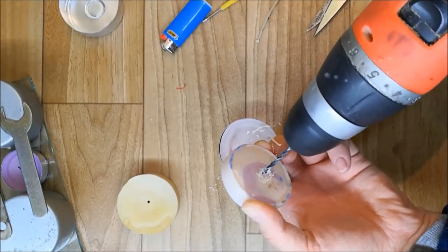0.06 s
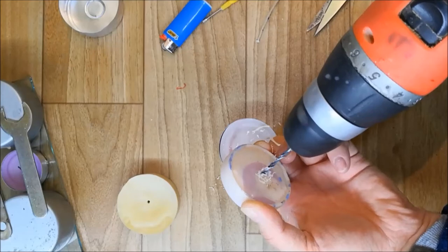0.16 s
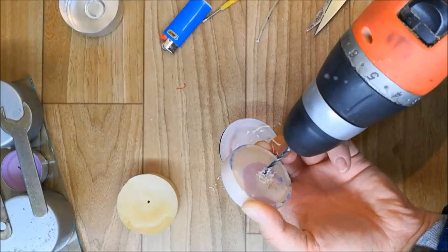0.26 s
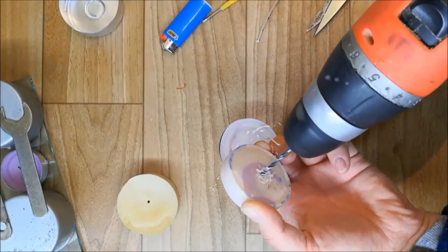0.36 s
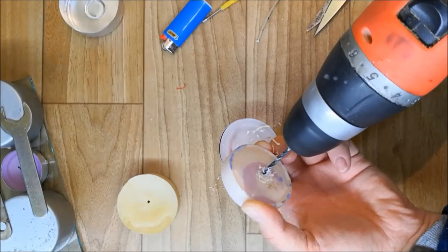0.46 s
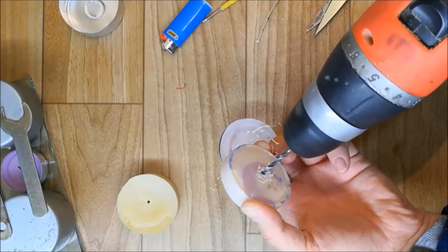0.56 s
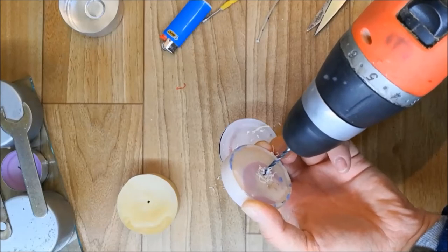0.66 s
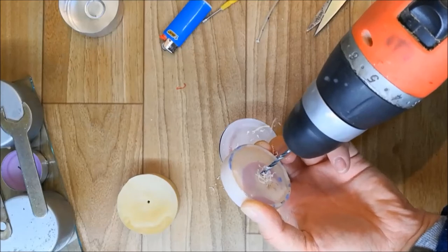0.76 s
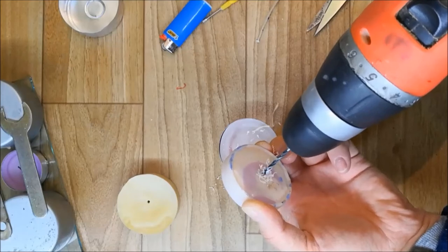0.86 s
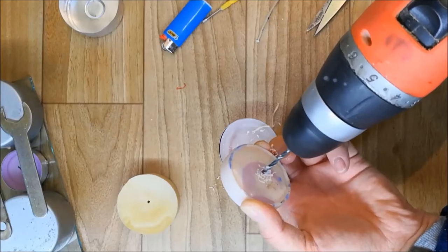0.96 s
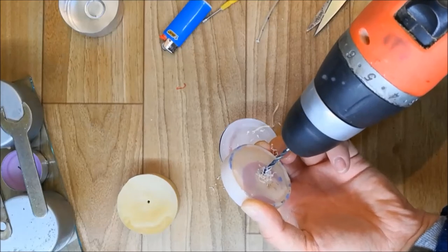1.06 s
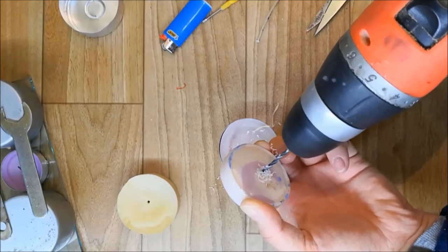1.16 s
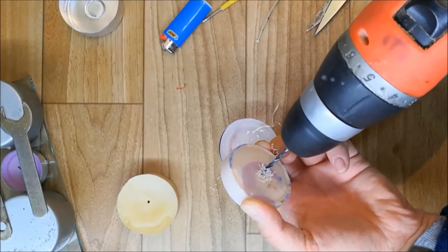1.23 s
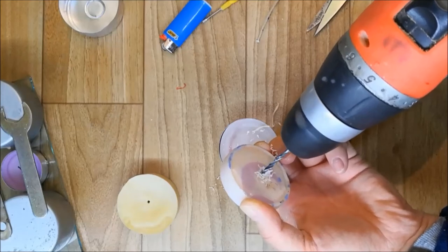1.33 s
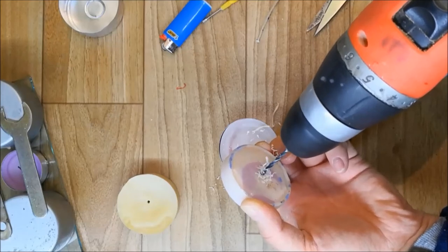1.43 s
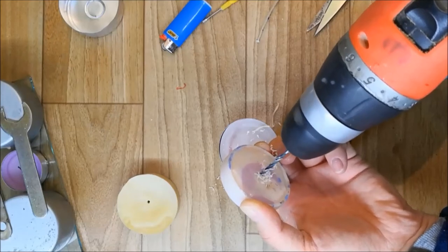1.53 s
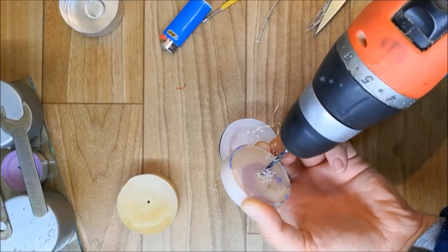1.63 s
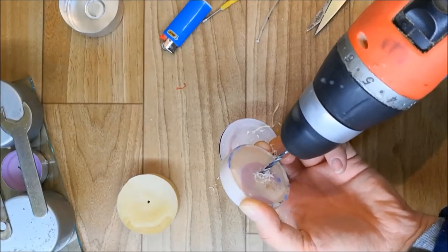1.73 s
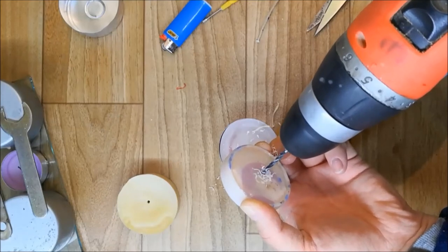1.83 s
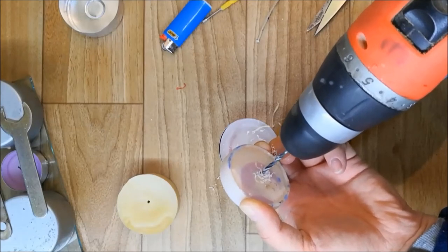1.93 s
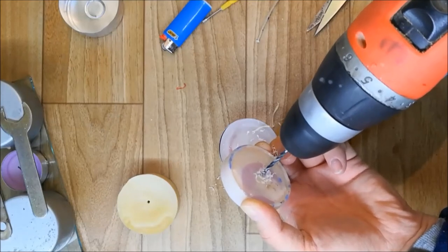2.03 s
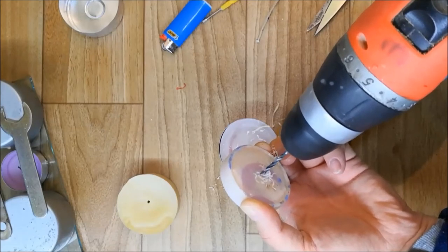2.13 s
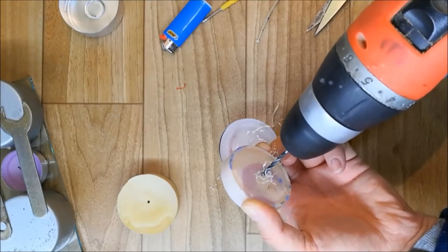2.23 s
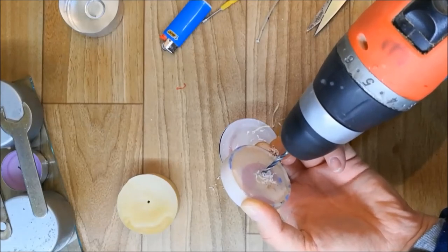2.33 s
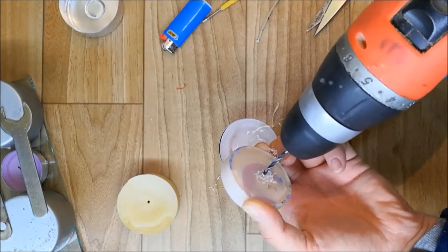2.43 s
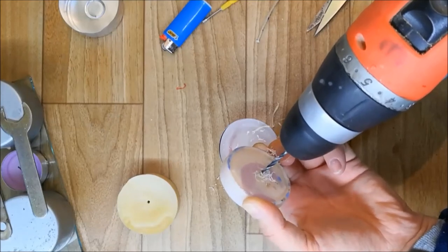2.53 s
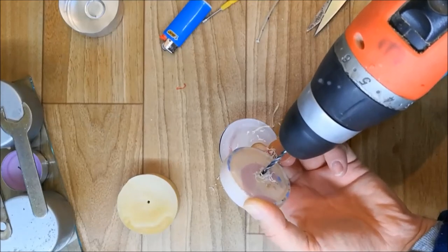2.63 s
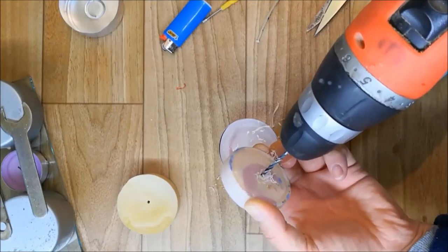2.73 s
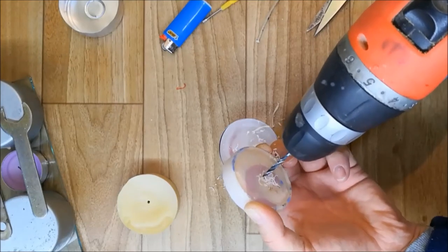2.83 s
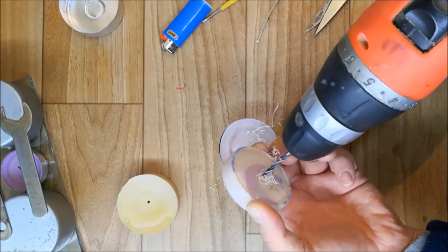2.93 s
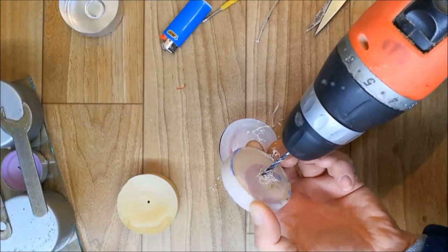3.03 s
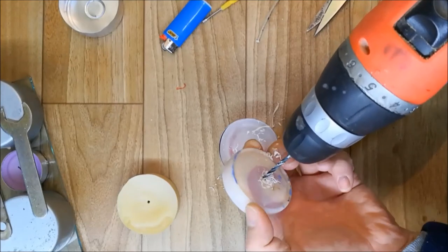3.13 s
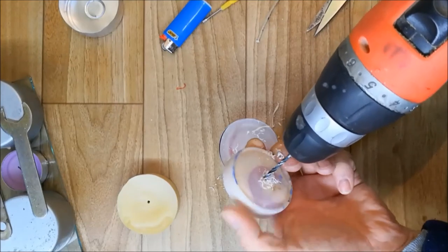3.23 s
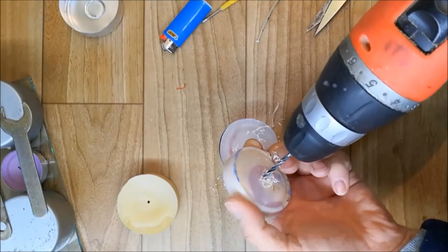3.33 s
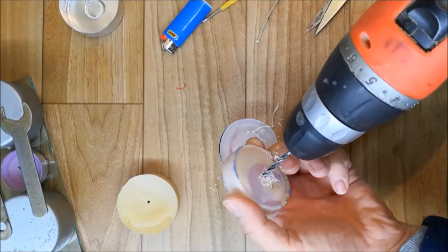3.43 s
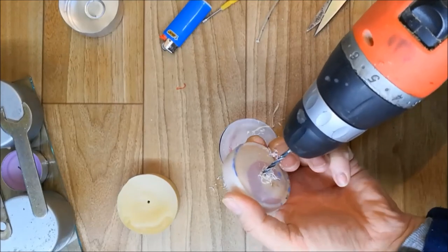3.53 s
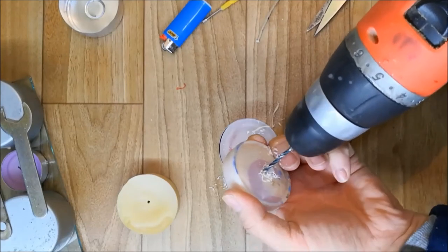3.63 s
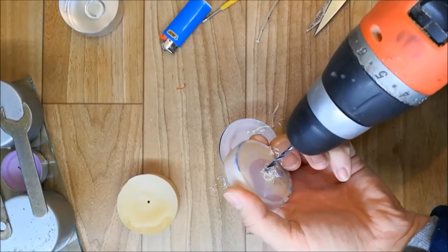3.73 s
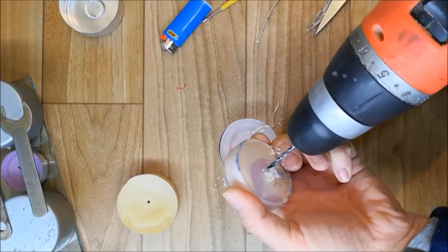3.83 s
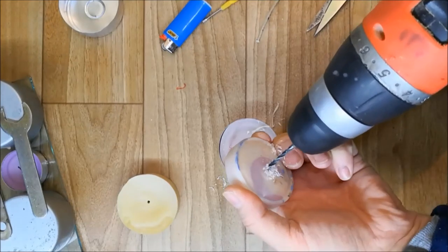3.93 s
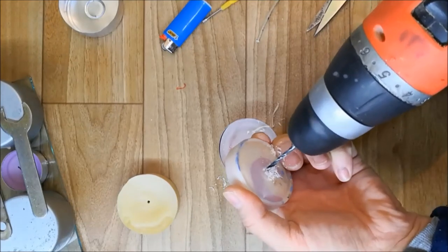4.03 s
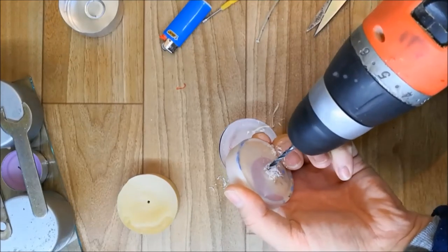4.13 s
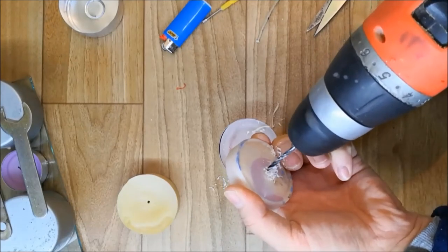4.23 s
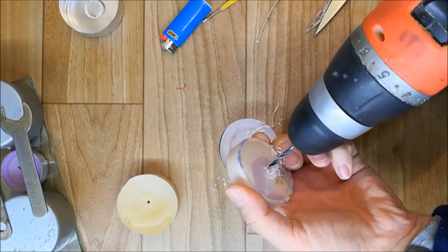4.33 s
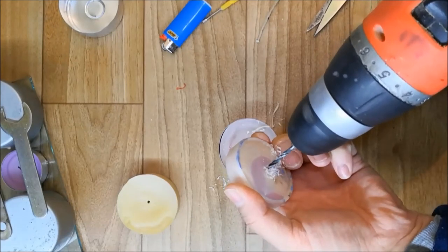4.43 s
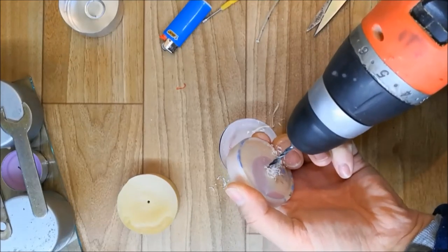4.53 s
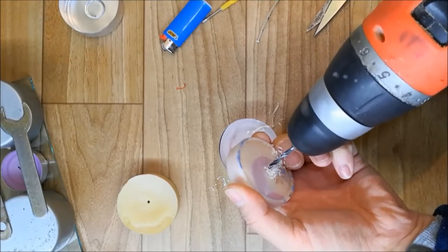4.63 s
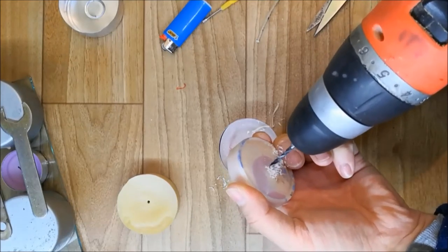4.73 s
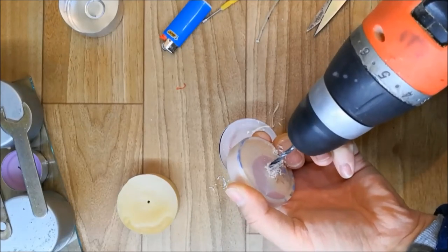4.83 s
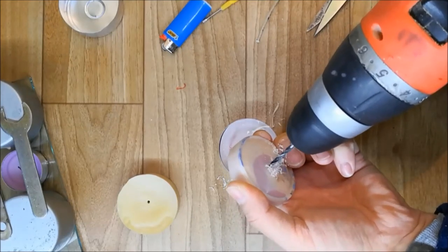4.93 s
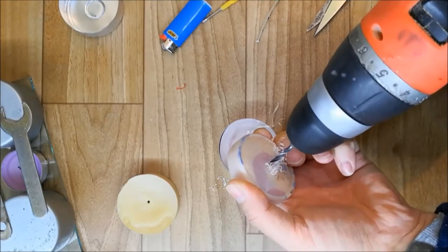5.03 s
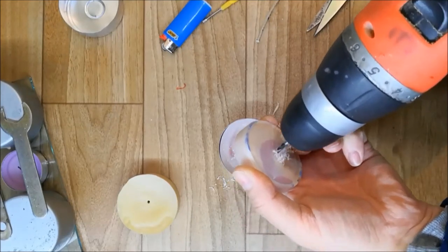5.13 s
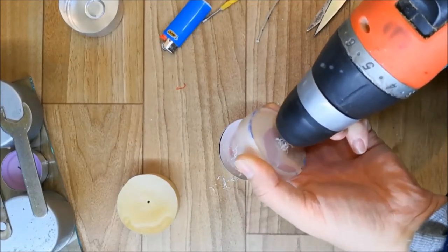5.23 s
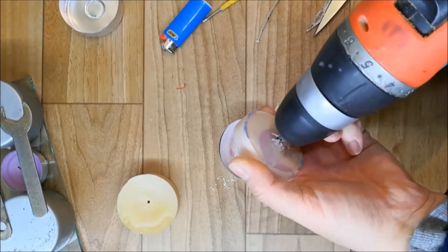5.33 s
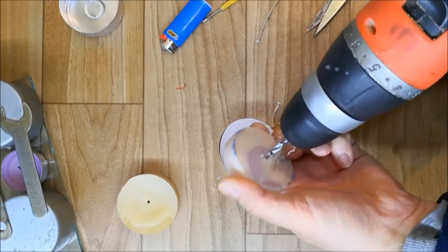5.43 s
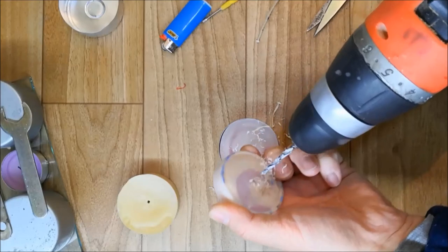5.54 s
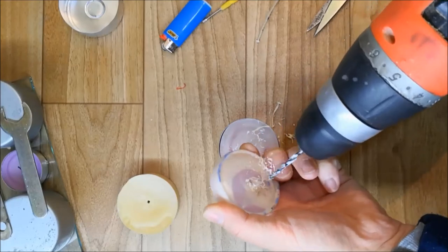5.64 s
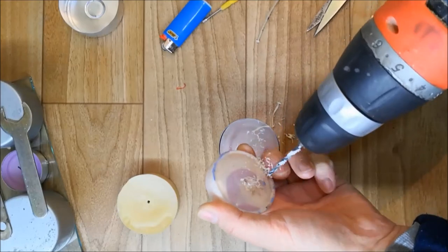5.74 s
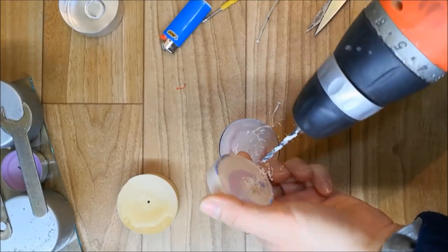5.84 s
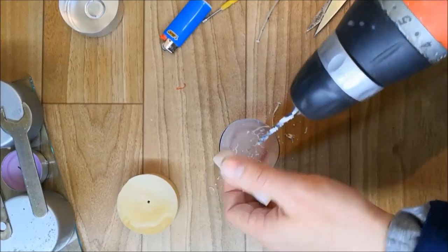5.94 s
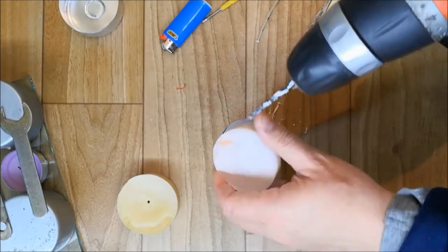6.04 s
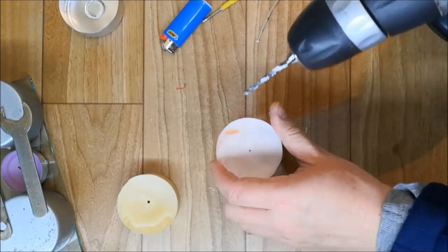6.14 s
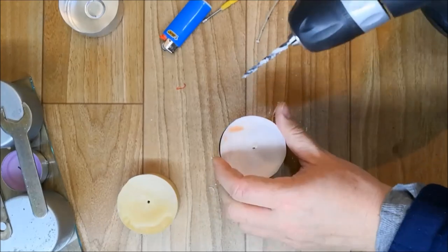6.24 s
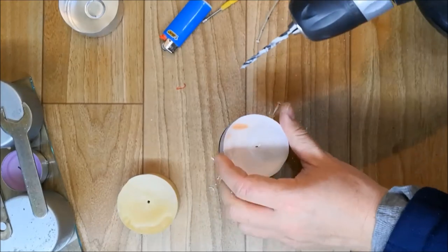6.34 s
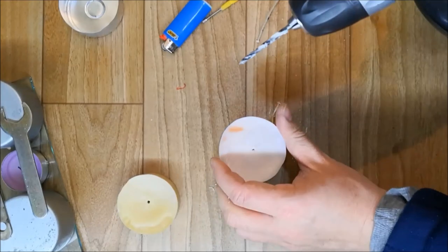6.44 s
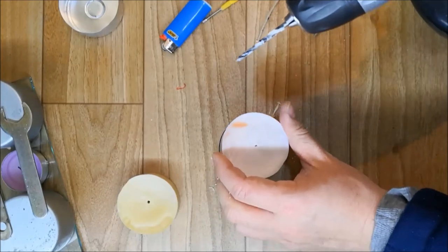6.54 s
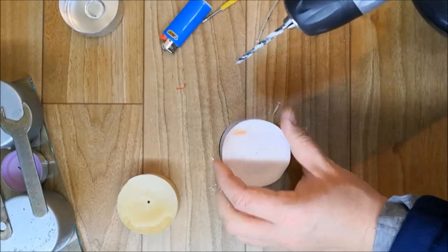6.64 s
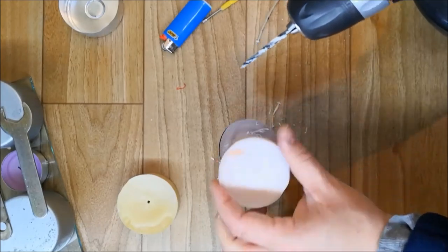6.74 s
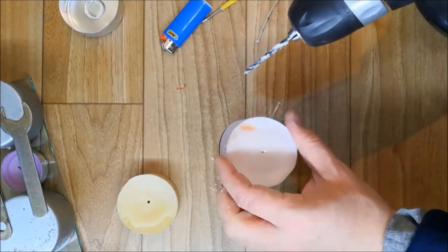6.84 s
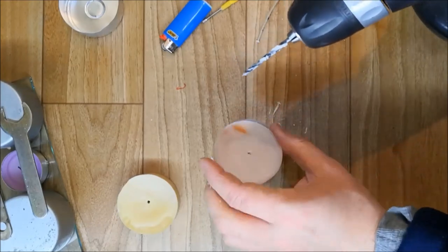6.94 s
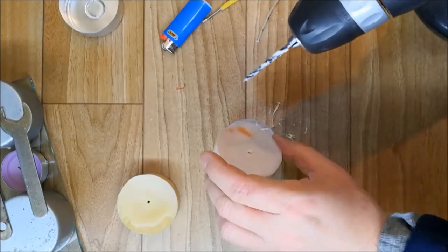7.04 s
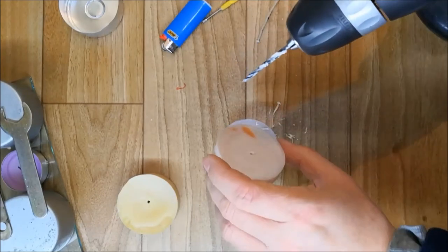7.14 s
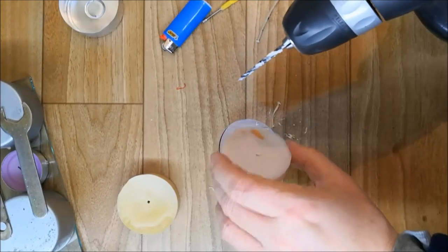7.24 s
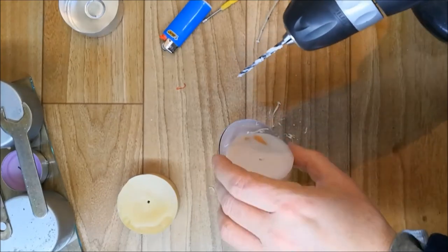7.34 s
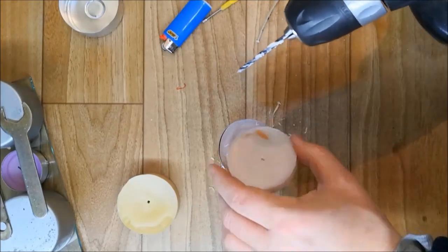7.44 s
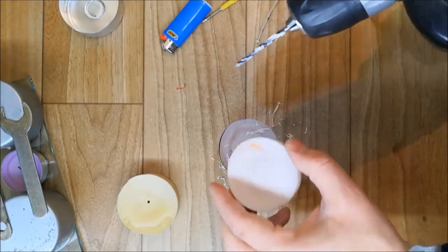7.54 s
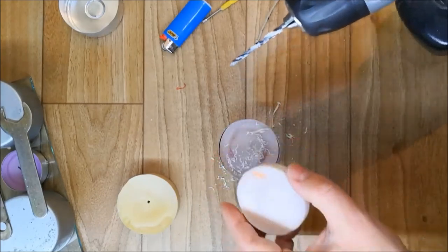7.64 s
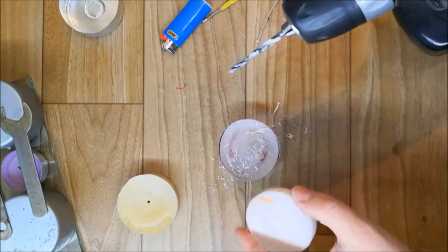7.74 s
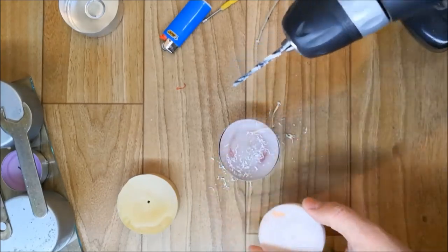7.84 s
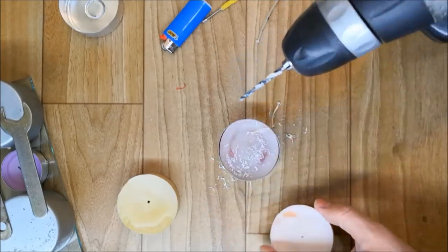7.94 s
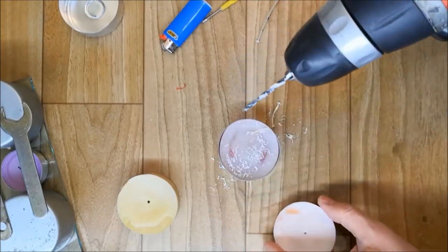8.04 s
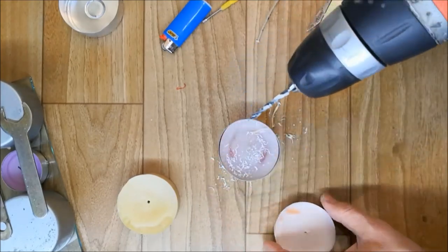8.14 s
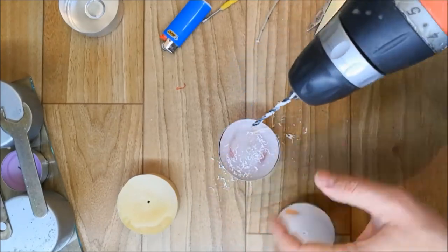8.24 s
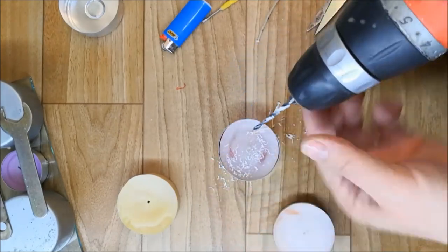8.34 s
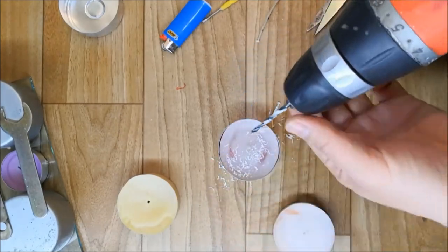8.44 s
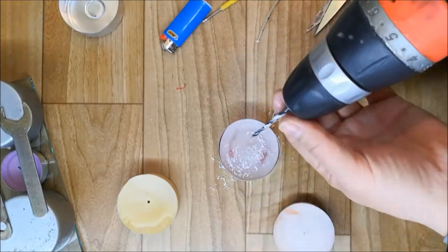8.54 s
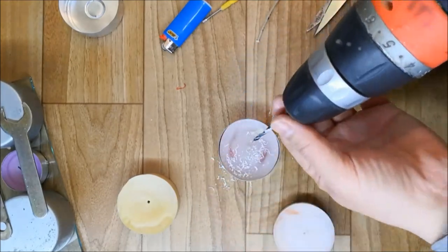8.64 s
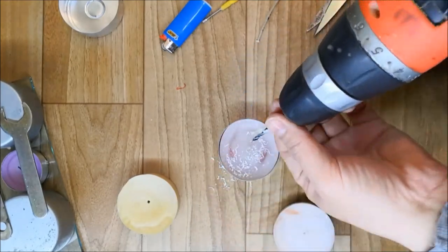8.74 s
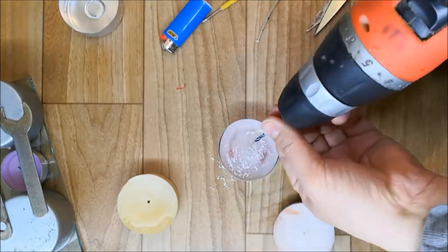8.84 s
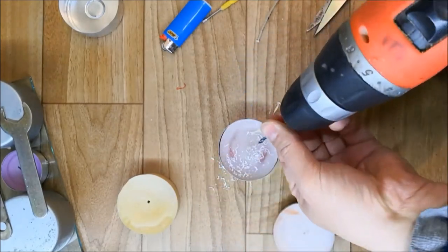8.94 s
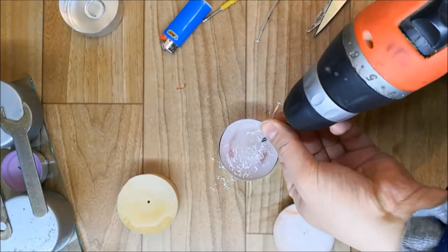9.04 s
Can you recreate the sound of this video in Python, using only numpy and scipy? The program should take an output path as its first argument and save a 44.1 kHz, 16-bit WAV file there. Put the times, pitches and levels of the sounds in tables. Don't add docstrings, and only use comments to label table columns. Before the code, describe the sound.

Close stereo pickup of a cordless drill boring a wax candle over a wooden floor. It is already at full speed, a steady gritty whirr with a thin gear whine, then brakes sharply with a clack. After a short pause with a small tap, the trigger chirps and a louder, rougher burst follows for two seconds. It stops with a hard clack; then quiet, one tap, and later a thing set down.

```python
import sys
import numpy as np
from scipy import signal
from scipy.fft import rfft, irfft, next_fast_len
from scipy.io import wavfile

SR = 44100
rng = np.random.default_rng(int(sys.argv[2]) if len(sys.argv) > 2 else 0)


def to_wav(sig):
    pcm = np.clip(np.atleast_2d(sig), -1, 1) * 32767
    pcm = np.round(pcm).astype(np.int16)
    wavfile.write(sys.argv[1], SR, pcm.T)


def ratio(d):
    e = np.asarray(d, float) / 20
    return 10 ** e


N = 400407
TIME_S = np.arange(N) / SR
FFT_SIZE = next_fast_len(N)
HZ = np.fft.rfftfreq(FFT_SIZE, 1 / SR) + 1e-3
FRAME = round(0.02 * SR)

# (frequency [Hz], density [dB per Hz])
FLOOR_COLOUR = [(30, -25), (50, -4.5), (75, -11), (98, -9.5), (150, -6.5), (200, -4), (244, 1.5), (300, -8),
                (350, -6.5), (398, -4.5), (873, -4.5), (971, -6.5), (1450, -5.5), (2180, -7), (3780, -8.5),
                (5320, -11.5), (6800, -20), (9640, -43.5), (12500, -66), (21200, -120)]
# (frequency [Hz], left-right [dB])
FLOOR_BALANCE = [(60, 5), (210, -3), (740, -1), (2610, -4), (9190, -4.5)]
# (frequency [Hz], power share [0-1])
BUZZ_SHARE = [(50, 0.67), (150, 0.99), (400, 0.53), (1000, 0.54), (2200, 0.28), (5000, .36)]
# (time [s], level [dB], sag [dB/s])
GATE = [(2.93, -63.5, 168.5), (3.045, -94, 900), (3.11, -76, 17), (3.21, -67, 74), (3.27, -72.5, -8),
        (3.7, -63, 28), (5.93, -70.5, 249.5), (5.99, -82.5, 72), (6.1, -96.5, 1500), (6.275, -83.5, -4.5),
        (6.38, -82.5, -110), (6.45, -72, -110), (6.52, -66, 200), (6.56, -73.5, 6), (6.7, -74, 33),
        (7.0, -75.5, 3), (7.75, -79.5, 0), (8.145, -74.5, 5), (8.6, -76, 15), (8.8, -78.5, 0),
        (9.07, -78.5, -4.5)]
# (time [s], peak [dB], frequency [Hz], t60 [s], rumble [dB])
BUMPS = [(2.28, -66, 90, .1, -68), (2.6, -66, 90, .1, -68), (2.871, -59, 79, 0.12, -93),
         (3.194, -70, 230, .08, -85), (5.86, -59, 80, 0.11, -96), (6.19, -78, 55, .06, -110),
         (6.487, -67, 52, .1, -87), (6.505, -43.5, 140, 0.024, -77), (6.997, -59.5, 75, 0.12, -74),
         (8.142, -53.5, 90, 0.07, -94), (8.179, -56, 86, .08, -80.5), (8.286, -58.5, 95, 0.081, -75)]
# (time [s], [(frequency [Hz], peak [dB], t60 [s], left-right [dB])])
TAPS = [
    (3.1895, [(1300, -47, 0.0092, 7), (1650, -40, .009, -8), (3150, -53, .004, 5), (4200, -49, .004, 4), (1950, -45, .007, 4), (2600, -42.5, 0.0055, 4), (3700, -43.5, 0.004, 6), (4720, -42, 0.0087, -10), (5350, -46, .005, -1), (6100, -50, 0.0046, 8), (6900, -51, .005, 7)]),
    (6.499, [(1150, -49, .006, 2), (1850, -46, .007, 2), (2300, -46, 0.0067, -1), (2800, -45, 0.0085, -1), (3350, -49, .006, 1), (3800, -59, .004, 0), (4750, -58, .004, 0), (4300, -52, .006, -2), (5200, -55, .005, 3)]),
    (8.1819, [(447, -54, .008, 3), (800, -61, .006, 3), (1550, -53, .005, 2), (2110, -51.5, .006, -4), (2650, -39.5, 0.0081, 10), (2420, -63, .07, 4), (3220, -47, .004, 4), (3820, -49, .004, 6), (5000, -62, .004, 3), (1150, -61, .005, 3), (4450, -50.5, .006, 1), (5700, -61, .005, 4)]),
]
# (middle [s], half length [s], level [dB], frequency [Hz], width [Hz])
CHUCK_RUMBLE = [
    (4.5, .55, -68.5, 125, 40),
    (3.42, .25, -75.5, 235, 110),
    (8.225, .03, -81, 2500, 700),
    (8.345, .022, -81, 2400, 1500),
    (10, 0.27, -88, 246, 60),
]
# (time [s], frequency [Hz], peak [dB], half length [s], left-right [dB])
PINGS = [(2.805, 2628, -38, .008, -11), (2.834, 2600, -42, 0.004, -12), (2.866, 640, -43.5, 0.0072, 14),
         (2.868, 1560, -42, .008, -9), (2.872, 3390, -42, 0.007, 1), (2.871, 2550, -42, .006, 0),
         (3.858, 250, -56, .012, 0), (3.866, 650, -53, .012, 4), (2.889, 360, -50, .008, 0),
         (3.745, 260, -57, .012, 0), (3.772, 300, -54, .01, 0), (5.88, 290, -56, .012, 0),
         (5.853, 2900, -38, .006, 0), (3.696, 3640, -51, .006, 7), (3.753, 3760, -40, .012, 3),
         (3.77, 2130, -41, .007, 4), (3.795, 290, -49, .012, 3), (3.800, 970, -47, 0.021, 0),
         (3.815, 1403, -37.5, 0.012, -10.5), (3.817, 3390, -39.5, 0.0086, 6), (3.820, 508, -45, 0.009, 9.5),
         (3.914, 2380, -36.5, .006, 8.5), (5.792, 950, -42, .010, 10), (5.842, 3135, -38, 0.009, 4),
         (5.856, 3590, -36, .006, 7.5)]
# (time [s], level [dB], length [s])
CLACKS = [
    (2.872, -41.5, 0.015),
    (3.813, -42, 0.026),
    (5.852, -38, 0.02),
]
# [(frequency [Hz], level [dB], t60 [s])]
CLACK_MODES = [
    [(651, -7.5, 0.091), (1170, -4, 0.044), (1550, 5.5, 0.02), (2470, 0.5, 0.026), (2900, -3, .015),
     (3620, -4, 0.019), (4300, -6.5, 0.014)],
    [(283, -14, 0.049), (498, -12, .04), (1440, -2, 0.051), (2125, -1, 0.047), (3720, 0, 0.03)],
    [(637, -13, 0.084), (1060, -7.5, 0.019), (1430, -1, 0.016), (1743, -2, 0.034), (3050, -4, 0.039)],
]
# (time [s], level [dB])
SQUEEZE = [(3.673, -95), (3.676, -58), (3.695, -60), (3.699, -45), (3.74, -44), (3.77, -49), (3.8, -80)]
# (frequency [Hz], width [Hz], level [dB])
SWITCH_TONES = [(2600, 140, -11), (3700, 330, -2.5)]
# (trigger pulled [s], let go [s], chuck stopped [s], full speed [turns/s], creep [turns/s per s])
RUN_FIRST = (-2.0, 2.775, 2.885, 293.1, .34)
RUN_SECOND = (3.672, 5.757, 5.864, 299, .3)
# (grind [dB], hum [dB], commutator [dB], whine [dB], drop at power cut [dB], fall once stopped [dB/s])
LOAD_FIRST = (-38, -52.5, -51.5, -54.5, 0, 426)
LOAD_SECOND = (-33.5, -51, -53, -48.5, 0.5, 498)
# (frequency [Hz], density [dB per Hz])
GRIND_FIRST = [(24, -49), (40, -25.5), (54, -40.5), (204, -25), (295, -5.5), (379, -22), (658, -23),
               (886, -16), (971, -9.5), (2380, -9), (2670, -2.5), (2990, -8), (5430, -14), (6830, -23),
               (9640, -50), (12500, -81), (21200, -120)]
GRIND_SECOND = [(24, -56), (40, -24.5), (54, -38), (240, -21.5), (295, -15.5), (456, -24.5), (738, -20.5),
                (886, -9.5), (1170, -8.5), (1980, -7), (2430, -5), (2730, -8.5), (2990, -5), (6230, -15),
                (9640, -48), (12500, -94.5), (21200, -120)]
# (frequency [Hz], left-right [dB])
GRIND_BALANCE = [(60, 4), (100, -2.5), (180, -1.5), (320, -1), (560, 4), (980, 0.5), (1720, -3.5),
                 (3000, 1), (5250, 6), (9190, 6)]
# (frequency [Hz], width [Hz], level [dB], left-right [dB])
HOUSING_FIRST = [(269, 130, -3, 1), (875, 53, 7, 15.5), (716, 60, 1, -4.5), (1190, 52, -2, -7),
                 (1340, 57, -4, 2), (2340, 200, -2, 5.5), (1977, 450, 4, 6.5), (2420, 450, 2, 2.5),
                 (2657, 610, -4, -9.5), (3315, 680, 3.5, 7.5), (4250, 830, -2.5, -3.5),
                 (5300, 320, 2, -2.5), (7870, 910, -4, -7.5)]
HOUSING_SECOND = [(131, 20, -0.5, 3.5), (290, 45, -1, 10), (905, 200, -0.5, 9), (1190, 65, -3.5, -5),
                  (1560, 100, -2.5, 6.5), (3060, 300, -2, 3), (6300, 900, -2, 4), (7900, 900, -3.5, -5.5),
                  (1790, 120, 4.5, 8), (1980, 220, 4, 4.5), (2440, 240, -10, 4), (2650, 340, 6.5, -5.5),
                  (3550, 410, 5, 3.5), (3750, 150, 0, -0.5), (4120, 280, -4, -3), (5370, 67, 6.5, -9.5)]
SLACK_DB = [3, -2.5, -2.5, 1, 0, -2, 1]
# (flutter [dB], flutter rate [1/s], coasting fade [dB/s], share of housing tuning [1])
ORDER_HABITS = [(2.0, 12, 30, .2), (3.6, 18, 200, .55), (1.3, 25, 1400, 1.3)]
# (left-right [dB], left lead [rad])
PLACE_FIRST = [(-1.5, .45), (2.8, 2.2), (-22, -1.1)]
PLACE_SECOND = [(-1.9, .55), (9, 1.9), (-22, -2.5)]
# (multiple [1], level re commutator [dB], left-right [dB])
WEAK_ORDERS = [(2, -17, 8), (5, -14, -7.5), (6, -8, 8.5), (12, -11.5, 7)]
# (middle [s], half length [s], multiple [1], lift [dB])
FLARES = [(.225, .165, 9, 7), (3.91, .025, 1, 4), (3.85, .035, 1, -8), (4.0, .05, 3, 6), (.55, .13, 9, -3),
          (.85, .1, 9, -1.5), (1.17, .03, 9, -4), (1.65, .06, 9, -3), (4.22, .05, 9, 2), (5.73, .035, 9, 3),
          (2.75, .03, 9, 4), (5.63, .09, 5, 11), (5.38, .04, 5, 8), (4.15, .06, 2, 4), (5.1, .3, 2, 4),
          (.25, .25, 2, -5), (4.42, .03, 3, -5), (4.68, .04, 3, -6), (4.95, .08, 3, 2), (4.7, .04, 6, 11),
          (4.88, .04, 6, 12), (5.68, .07, 6, 7), (.45, .08, 1, -4), (.95, .15, 1, 2.5), (4.02, .035, 1, 4),
          (4.08, .03, 1, -2), (4.15, .04, 1, -3), (4.45, .1, 1, 2), (4.68, .1, 1, -3), (2.5, .15, 1, -3),
          (5.54, .05, 1, 3), (5.11, .06, 3, 5), (5.23, .05, 3, -8), (5.36, .04, 3, 4), (5.48, .05, 3, 4.5)]
# (frequency [Hz], width [Hz], level re whine [dB])
SKIRT_FIRST = [(2628, 200, -5), (2760, 79, -7.5), (2666, 45, -9)]
SKIRT_SECOND = [(2690, 60, -7), (2803, 26, -4), (2750, 120, -5)]
# (middle [s], half length [s], level [dB])
CLIMB = (3.84, 0.052, -57)
# (frequency [Hz], level re grind [dB], left-right [dB])
CONTROLLER = [(5100, -33, 6), (7096, -38, 5), (7600, -47, 0)]


def rms_one(x):
    return x / np.sqrt(np.mean(x ** 2) + 1e-20)


def at_hz(points):
    hz, values = np.transpose(points)
    return np.interp(np.log(HZ), np.log(hz), values)


def sides(db):
    return ratio(np.array([db, -db]) / 2)


def pan(x, db):
    return x * sides(db)[:, None]


def shaped(x, gain):
    return irfft(rfft(x, FFT_SIZE) * gain, FFT_SIZE)[..., :N]


def band(rows):
    return sum(ratio(db) / np.sqrt(width) / (1 + (2 * (HZ - hz) / width) ** 2) for hz, width, db in rows)


def drift(rate_hz):
    pole = np.exp(-80 * np.pi * rate_hz / SR)
    noise = rng.standard_normal(N // 40 + 2002)
    slow = signal.lfilter([1], [1, -2 * pole, pole ** 2], noise)[2000:]
    return np.interp(np.arange(N) / 40, np.arange(len(slow)), rms_one(slow))


def swell(t, rise_s, t60_s):
    return np.where(t < 0, np.exp(-(t / rise_s) ** 2), ratio(-60 * t / t60_s))


def ring(x, hz, t60_s):
    pole, turn = ratio(-60 / (t60_s * SR)), 2 * np.pi * hz / SR
    return signal.lfilter([0, np.sin(turn)], [1, -2 * pole * np.cos(turn), pole ** 2], x + 1e-18)


def framed_noise(share, alike):
    bins = FRAME // 2 + 1
    lines = np.exp(2j * np.pi * rng.random((3, bins))) * ratio(rng.normal(0, 1.5, bins))
    pattern = np.tile(rms_one(irfft(lines, FRAME)), N // FRAME + 1)[:, :N]
    fresh = rng.standard_normal((3, N))
    noise = np.sqrt(1 - share) * fresh + np.sqrt(share) * pattern
    return np.sqrt(alike) * noise[0] + np.sqrt(1 - alike) * noise[1:]


def gate():
    open_db_per_s = 303
    level_db = np.full(N, -140.)
    ends_s = [row[0] for row in GATE[1:]] + [N / SR]
    for (s, db, sag_db_per_s), end_s in zip(GATE, ends_s):
        since_s = TIME_S - s
        shape_db = db + np.where(since_s < 0, open_db_per_s, -sag_db_per_s) * since_s
        level_db = np.where(TIME_S < end_s, np.maximum(level_db, shape_db), level_db)
    return level_db


def recorder_floor():
    hiss, buzz = framed_noise(share=0, alike=0.7), framed_noise(share=1, alike=0.96)
    buzz[:, round(0.0119 * SR)::FRAME] += 14.0
    buzz[:, round(0.0169 * SR)::FRAME] -= 11.0
    gain = ratio(at_hz(FLOOR_COLOUR)) * sides(at_hz(FLOOR_BALANCE))
    share = at_hz(BUZZ_SHARE)
    level_db = gate()
    hiss_lift_db = 0.39 * np.clip(level_db + 75.5, 0, 12)
    hiss = ratio(hiss_lift_db) * shaped(hiss, gain * np.sqrt(1 - share))
    buzz = shaped(buzz, gain * np.sqrt(share))
    return ratio(level_db + 0.3 * drift(30)) * (hiss + buzz) / np.sqrt(np.mean(gain ** 2))


def bumps():
    out, t = np.zeros(N + 2 * SR), np.arange(-2000, SR) / SR
    rumble = rms_one(shaped(rng.standard_normal(N), band([(70, 40, -7.5), (125, 85, 6.5)])))
    for k, (s, db, hz, t60_s, rumble_db) in enumerate(BUMPS):
        i = round(s * SR) - 2000
        boards = np.sin(2 * np.pi * hz * t) + 0.4 * np.sin(2 * np.pi * 1.61 * hz * t)
        out[i:i + len(t)] += ratio(db) * swell(t - 0.86 / hz, 0.43 / hz, t60_s) * boards
        lingering = rumble[k * 9000:][:len(t)]
        out[i:i + len(t)] += ratio(rumble_db) * swell(t, 0.003, 1.1) * lingering
    return shaped(out[:N], 1 / (1 + (HZ / 400) ** 2))


def taps():
    out, t = np.zeros((2, N)), np.arange(-200, 4000) / SR
    for s, modes in TAPS:
        i = round(s * SR) - 200
        for hz, db, t60_s, pan_db in modes:
            lag_s = rng.uniform(-0.0005, 0.0007)
            phase = rng.uniform(0, 2 * np.pi) + rng.uniform(-0.7, 0.7, (2, 1))
            tone = np.cos(2 * np.pi * hz * t + phase)
            out[:, i:i + len(t)] += pan(ratio(db) * swell(t - lag_s, 0.0005, t60_s) * tone, pan_db)
    late_s = np.arange(round(0.3 * SR)) / SR
    room = rng.standard_normal((2, len(late_s))) * ratio(-36.5 - 60 * late_s / 0.14) * (late_s > 0.003)
    return out + signal.fftconvolve(out.mean(axis=0, keepdims=True), room, axes=1)[:, :N]


def chuck_rumble():
    out = np.zeros((2, N))
    for middle_s, half_s, db, hz, width_hz in CHUCK_RUMBLE:
        noise = rng.standard_normal(N) + 0.7 * rng.standard_normal((2, N))
        lumps = rms_one(shaped(noise, band([(hz, width_hz, 0)]) ** 2))
        out += ratio(db) * np.exp(-((TIME_S - middle_s) / half_s) ** 4) * lumps
    return out


def pings():
    out, t = np.zeros((2, N)), np.arange(-2000, 2000) / SR
    for s, hz, db, half_s, pan_db in PINGS:
        i = round(s * SR) - 2000
        tone = np.sin(2 * np.pi * hz * t + rng.uniform(0, 1.5, (2, 1)))
        out[:, i:i + len(t)] += pan(ratio(db) * np.exp(-(t / half_s) ** 2) * tone, pan_db)
    return out


def clacks():
    out, t = np.zeros((2, N)), np.arange(-2000, 12000) / SR
    high_pass = signal.butter(2, 200, "high", fs=SR, output="sos")
    for (s, db, length_s), modes in zip(CLACKS, CLACK_MODES):
        blows = ratio(db - 17.5) * np.exp(-(t / length_s) ** 2) * rng.standard_normal((2, len(t)))
        blows = signal.sosfilt(high_pass, blows)
        i = round(s * SR) - 2000
        out[:, i:i + len(t)] = sum(ratio(mode_db) * ring(blows, hz, t60_s) for hz, mode_db, t60_s in modes)
    return out


def switch():
    s, db = np.transpose(SQUEEZE)
    level_db = np.interp(TIME_S, s, db, left=-140, right=-140)
    return ratio(level_db) * rms_one(shaped(rng.standard_normal((2, N)), band(SWITCH_TONES)))


def rotor(run):
    pulled_at_s, let_go_at_s, stopped_at_s, full, creep = run
    pulled_s, let_go_s, stopped_s = (
        np.maximum(TIME_S - s, 0) for s in (pulled_at_s, let_go_at_s, stopped_at_s))
    spin_up = 1 - np.exp(-(pulled_s / 0.16) ** 1.7)
    settle = 1 - 0.08 * np.exp(-pulled_s / 0.13)
    top = full + creep * np.minimum(pulled_s, let_go_at_s - pulled_at_s)
    brake_turns_per_s2 = 180
    speed = np.maximum(top * spin_up * settle - brake_turns_per_s2 * let_go_s, 0)
    return speed, top, pulled_s, let_go_s, stopped_s


def flare_db(multiple):
    t = np.arange(0, N, 64) / SR
    lift_db = np.zeros(len(t))
    for s, half_s, order, db in FLARES:
        if order == multiple:
            lift_db += db * np.exp(-((t - s) / half_s) ** 4)
    return np.interp(TIME_S, t, lift_db)


def patchy(x, gain, slack, own_db):
    spectrum = rfft(x, FFT_SIZE) * gain
    centres = np.log(np.array([500, 1100, 1700, 2200, 3000, 3700, 5500]))
    out = np.zeros((2, N))
    for row, db in zip(np.eye(len(centres)), SLACK_DB):
        share = np.interp(np.log(HZ), centres, row)
        region = irfft(spectrum * share, FFT_SIZE)[:, :N]
        out += ratio(own_db * drift(6.2) + db * slack) * region
    return out


def grind(turns, slack, colour, housing, level_db):
    gain = ratio(at_hz(colour)) * sides(at_hz(GRIND_BALANCE))
    for hz, width_hz, db, pan_db in housing:
        near = 1 / (1 + (2 * (HZ - hz) / width_hz) ** 2)
        gain = gain * ratio(db * near) * sides(pan_db * near)
    alike = 0.5 / (1 + (HZ / 240) ** 4)
    rub = 1 + 0.074 * np.cos(turns) + 0.14 * np.cos(2 * turns)
    noise = framed_noise(share=0.009, alike=0.014) * rub
    noise = patchy(noise, gain * np.sqrt(1 - alike), slack, own_db=0.8)
    noise += shaped(rng.standard_normal(N), gain * np.sqrt(alike))
    return ratio(level_db + 0.41 * drift(25)) * rms_one(noise)


def whine_skirt(skirt):
    window = 0.5 / (1 + ((HZ - 2730) / 170) ** 4)
    rough = shaped(rng.standard_normal((2, N)), band(skirt) * np.sqrt(SR) * window)
    return pan(ratio(1.5) * rough, -21)


def climb_strand(turns):
    middle_s, half_s, db = CLIMB
    level = ratio(db + 4.6 * drift(25)) * np.exp(-((TIME_S - middle_s) / half_s) ** 2)
    return pan(level * np.sin(3 * turns), 4.1)


def controller():
    return sum(pan(ratio(db) * np.sin(2 * np.pi * hz * TIME_S), pan_db) for hz, db, pan_db in CONTROLLER)


def burst(run, load, colour, housing, skirt, places):
    speed, top, pulled_s, let_go_s, stopped_s = rotor(run)
    grind_db, *order_levels_db, cut_db, fall_db_per_s = load
    wake_db = -42 * np.exp(-pulled_s / 0.038)
    effort_db = np.where(pulled_s > 0, wake_db - fall_db_per_s * stopped_s, -np.inf)
    bite_db = -5.5 * np.exp(-pulled_s / 0.15)
    unload_db = -cut_db * (1 - np.exp(-let_go_s / 0.0049))
    level_db = grind_db + effort_db + bite_db + unload_db
    turns = 2 * np.pi * np.cumsum(speed * (1 + 0.0016 * drift(22))) / SR
    tuned = 1 / (1 + ((1 - speed / top) / 0.022) ** 2)
    out = grind(turns, 1 - tuned, colour, housing, level_db)

    gains = []
    for db, (flutter_db, rate_hz, fade_db_per_s, reach) in zip(order_levels_db, ORDER_HABITS):
        order_db = db + effort_db + flutter_db * drift(rate_hz) - fade_db_per_s * let_go_s
        gains.append(ratio(order_db) * tuned ** reach * (speed / top) ** 2)
    hum, commutator, whine = gains
    for multiple, gain, (pan_db, lead_rad) in zip((1, 3, 9), gains, places):
        tone = np.sin(multiple * turns + np.array([[lead_rad], [0]]))
        out += pan(ratio(5.5 + flare_db(multiple)) * gain * tone, pan_db)
    for multiple, db, pan_db in WEAK_ORDERS:
        tone = np.sin(multiple * turns + rng.uniform(0, 2.1, (2, 1)))
        out += pan(commutator * ratio(db + flare_db(multiple) + 3.9 * drift(24)) * tone, pan_db)

    out += whine * whine_skirt(skirt)
    out += (speed > 0) * (stopped_s == 0) * climb_strand(turns)
    out += ratio(level_db) * (let_go_s == 0) * controller()
    return out


def scene():
    background = recorder_floor() + bumps() + taps()
    drill = chuck_rumble() + pings() + clacks() + switch()
    drill += burst(RUN_FIRST, LOAD_FIRST, GRIND_FIRST, HOUSING_FIRST, SKIRT_FIRST, PLACE_FIRST)
    drill += burst(RUN_SECOND, LOAD_SECOND, GRIND_SECOND, HOUSING_SECOND, SKIRT_SECOND, PLACE_SECOND)
    return background + drill


def top_cut(x):
    return signal.sosfilt(signal.butter(12, 9790, fs=SR, output="sos"), x)


def record(dry):
    mix = dry + 0.00138
    return top_cut(mix)


dry = scene()
out = record(dry)
to_wav(out)
```